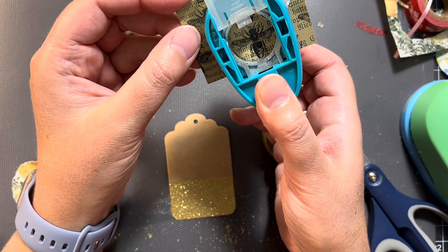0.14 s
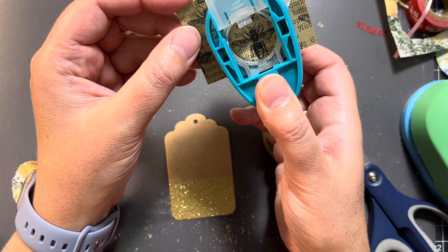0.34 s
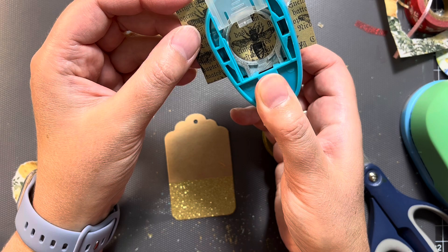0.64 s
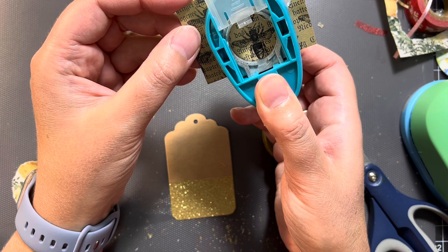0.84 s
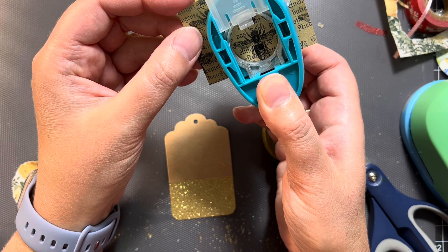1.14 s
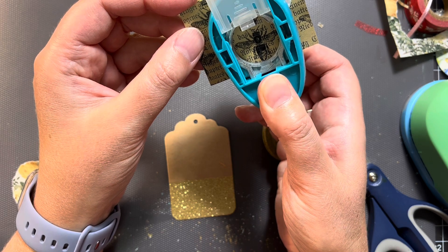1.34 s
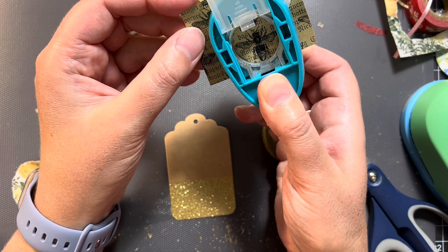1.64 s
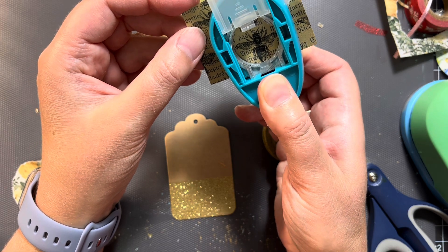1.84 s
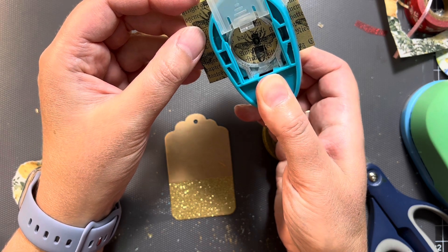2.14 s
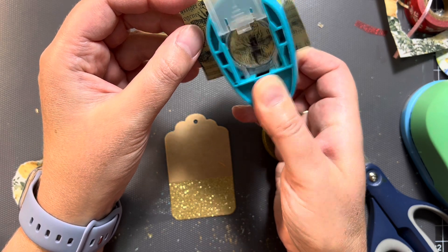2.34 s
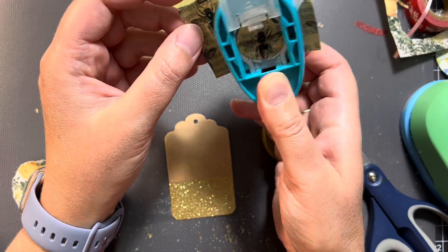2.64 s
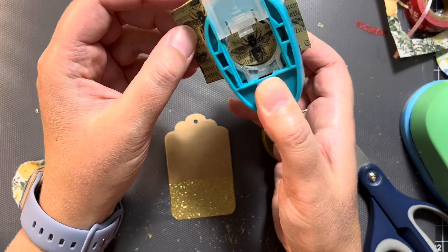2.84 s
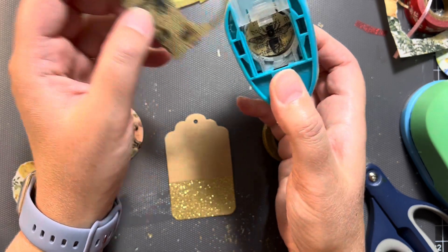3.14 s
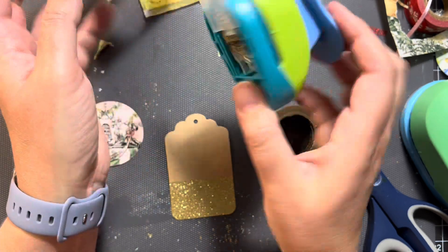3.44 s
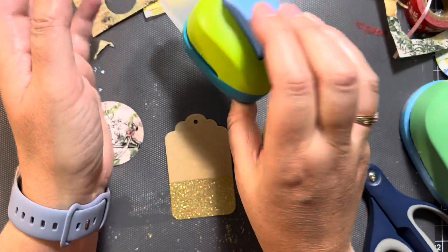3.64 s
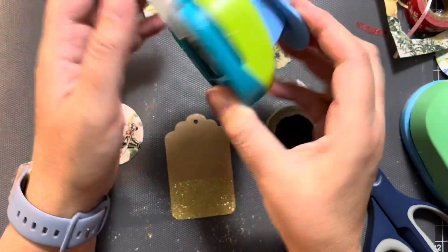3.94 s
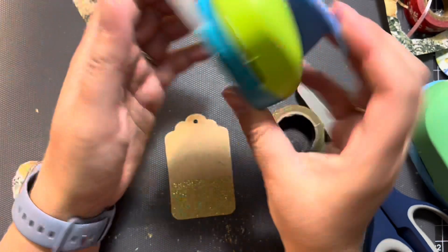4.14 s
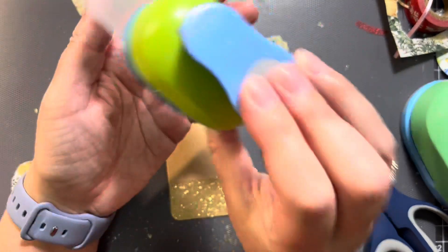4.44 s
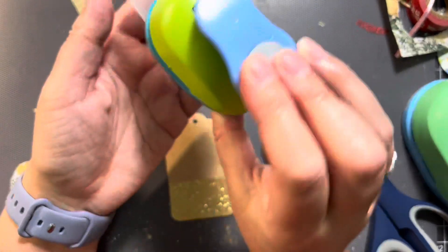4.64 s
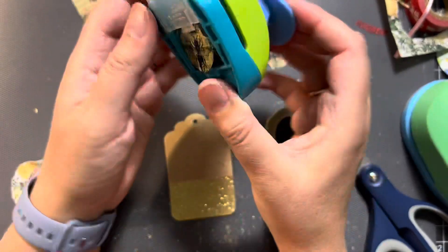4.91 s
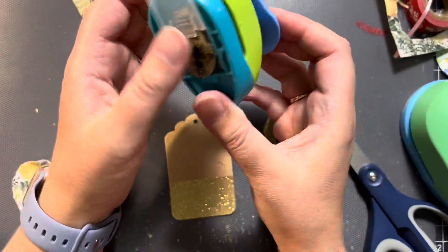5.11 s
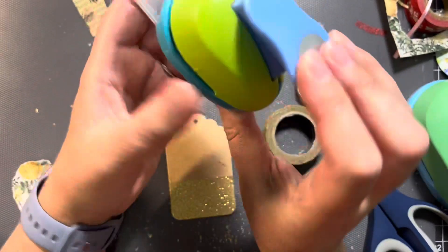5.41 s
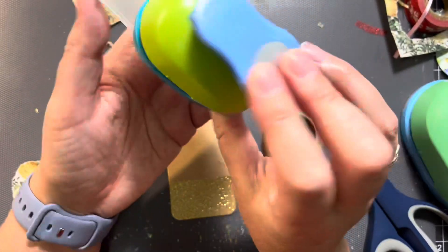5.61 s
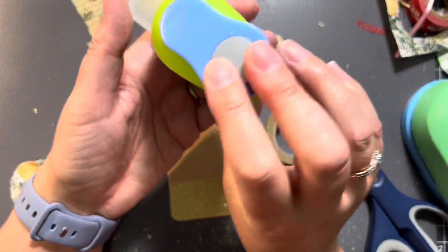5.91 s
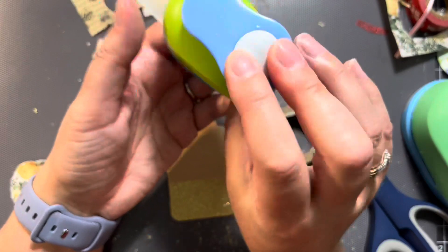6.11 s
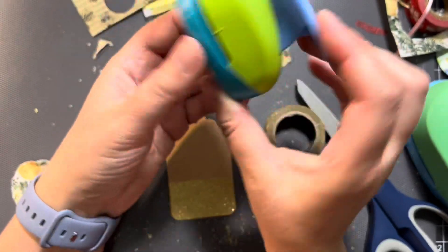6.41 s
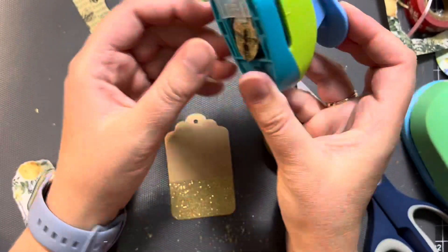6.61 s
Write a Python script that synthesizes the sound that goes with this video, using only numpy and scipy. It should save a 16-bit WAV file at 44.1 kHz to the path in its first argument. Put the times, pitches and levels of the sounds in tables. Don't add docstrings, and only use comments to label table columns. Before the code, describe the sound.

Close up in a quiet room, a hand punch clicks under pressure, cracks through card, springs back, and rattles lightly against a palm.

```python
import sys
import numpy as np
from scipy import signal
from scipy.fft import rfft, irfft
from scipy.io import wavfile
from scipy.ndimage import uniform_filter1d

SR = 44100
rng = np.random.default_rng(int(sys.argv[2]) if len(sys.argv) > 2 else 0)


def boost_factor(decibels):
    exponent = np.asarray(decibels, float) / 20
    return 10 ** exponent


def wrap_up_sound(samples):
    columns = np.atleast_2d(samples).T
    tamed = np.clip(columns, -1, 1)
    steps = np.round(tamed * 32767).astype(np.int16)
    wavfile.write(sys.argv[1], SR, steps)


N = 298248
SECONDS = np.arange(N) / SR

# frequency in Hz, density in dB per Hz.
AIR_SPECTRUM = [(7.1, -31.5), (12, 5.5), (63, -5.5), (80, -8), (245, -14), (386, -18.5), (491, -20),
                (589, -30), (926, -34.5), (1010, -31), (1970, -42), (3190, -40.5), (4060, -38),
                (12400, -39), (16300, -50.5)]
# frequency in Hz, rms level in dB.
APPLIANCE_TONES = [(425.3, -82), (489.9, -73.5), (559.9, -75.5), (786.0, -80), (1007, -82), (1055, -82.5),
                   (1120, -82.5), (3160, -90)]
# centre in seconds, half width in seconds, rise in dB.
TRAFFIC_SWELLS = [
    (2.6, 0.29, 5.6),
    (4.75, 0.62, 4.9),
    (6.03, 0.26, 5.4),
]
# centre in Hz, width in Hz, level in dB, decay time t60 in seconds.
ECHO_BANDS = [(400, 500, -39, 0.4), (930, 600, -36.5, 0.38), (1750, 380, -31, 0.3),
              (3000, 2000, -36.5, 0.2813), (5190, 4600, -30, 0.35), (7810, 4200, -29.5, 0.25),
              (9670, 2300, -33.5, 0.32), (11900, 5000, -31, 0.18)]
# start in seconds, length in seconds, level in dB, shell level in dB.
FINGER_RUBS = [(0.874, 0.043, -69, 3), (0.952, 0.0084, -67, 27), (1.212, 0.021, -59, 3.5),
               (1.325, 0.039, -65.5, -8), (1.448, 0.027, -62, -5), (1.709, .015, -71.5, -7),
               (1.763, 0.032, -67, -5), (1.906, 0.037, -59.5, 1), (2.005, 0.042, -68, -8),
               (2.17, 0.024, -70, -4.5), (2.33, 0.0093, -63, 4.5)]
# start in seconds, length in seconds, level in dB, shell level in dB.
SCRAP_RUBS = [(1.369, 0.057, -63.5, -9), (1.502, 0.088, -72, -9), (1.6, 0.093, -73.5, -8),
              (3.48, 0.04, -71, 1), (3.55, 0.052, -75.5, -1), (4.007, 0.026, -73, 10),
              (4.16, 0.046, -74, 12), (4.84, 0.08, -71, -2), (5.3, .06, -66, 2.5), (5.36, 0.058, -73, -2.5),
              (5.44, 0.043, -63.5, -9), (5.628, 0.068, -66, -4), (5.948, 0.064, -73, -7.5),
              (6.15, 0.062, -69, 2), (6.25, 0.042, -74, -10.5), (6.338, 0.075, -68, 0.5),
              (6.45, 0.068, -72.5, 5), (6.542, 0.062, -74.5, 7), (6.607, 0.031, -77, 11)]
# start in seconds, length in seconds, level in dB.
PALM_RUBS = [(3.399, 0.069, -74), (4.318, 0.053, -67), (4.53, 0.073, -72), (4.6, 0.043, -65.5),
             (4.926, 0.046, -75), (5.75, 0.057, -74), (5.84, 0.072, -69), (6.04, 0.053, -67),
             (6.215, 0.038, -65.5), (6.378, 0.073, -68.5)]
# start in seconds, length in seconds, level in dB, shell level in dB, edge level in dB.
SHEET_RUBS = [(2.55, 0.029, -66, 0, -12), (2.585, 0.042, -62, 10.5, -4), (2.628, 0.13, -63.5, 4.5, -3),
              (2.7, 0.11, -66.5, 4, -8), (2.85, 0.034, -66.5, 0, -3), (2.879, 0.04, -59.5, -7, -8),
              (2.958, 0.017, -53, -17, -1.5), (2.979, 0.041, -57.5, -4, -7), (3.025, 0.04, -60, -1, -9),
              (3.043, 0.052, -55, -2.5, -6), (3.097, 0.029, -64, 2.5, 2), (3.14, 0.023, -61.5, 4, -14)]
# start in seconds,
# length in seconds, level in dB, pitch in Hz.
ROUGH_TONE_EVENTS = [(0.955, 0.011, -47, 910), (1.419, 0.011, -48, 800), (5.4, 0.107, -63.5, 600),
                     (4.902, 0.14, -59.5, 607), (5.053, 0.139, -68, 590), (2.362, 0.057, -48, 1740),
                     (0.959, 0.025, -59, 1730), (1.012, 0.024, -62, 1650), (1.78, 0.022, -62, 1620),
                     (2.995, .045, -58, 5100), (3.11, .02, -64, 2900), (2.88, 0.038, -68, 3200),
                     (4.186, 0.019, -68, 4900), (4.158, .045, -63, 4200), (4.04, .012, -59, 2150),
                     (5.95, 0.114, -62.5, 630), (6.565, 0.024, -78, 4600), (6.55, .04, -73, 5550),
                     (6.215, .06, -72, 4200), (5.44, 0.026, -66, 4400), (2.36, .09, -55.5, 5300),
                     (0.965, 0.037, -61, 3200), (1.4, 0.069, -63, 1780), (2.703, 0.02, -42.5, 1740),
                     (3.035, 0.077, -57, 5900), (3.041, 0.026, -64, 2030), (4.4, 0.03, -57, 2120),
                     (4.083, 0.021, -67, 2270), (4.17, 0.039, -74, 5300), (4.532, 0.12, -66, 5520),
                     (4.4, 0.052, -65, 1940), (5.312, 0.046, -53, 1810), (5.313, 0.069, -63.5, 4180),
                     (6.39, 0.045, -60.5, 5470)]
# frequency in Hz, level in dB, decay time t60 in seconds.
GRIPPED_MODES = [
    [(620, -32, 0.006), (874, -10, 0.028), (1060, -5.5, 0.011), (1500, -5.5, 0.005), (1750, -8.5, 0.049), (2300, -4, 0.016)],
    [(2800, -6.5, 0.0071), (3420, -10.5, 0.015), (4230, -3, 0.006), (4770, 4, 0.0058), (5390, 5, 0.0039), (5500, -14.5, 0.0016), (7890, -12.5, 0.0069)],
]
SQUEEZED_MODES = [
    [(810, -5.5, .02), (1500, -8, .012), (1746, 0.5, .025), (2300, 1.5, 0.053)],
    [(2620, -10.5, .006), (2920, -4.5, 0.0092), (3170, -14, 0.017), (4082, -11.5, .025), (4970, -9, 0.019), (5182, -5.5, .004), (5662, -4, .012), (6300, -13, .006), (7330, -2, 0.0051)],
]
LOOSE_MODES = [
    [(766, -70, 0.006), (937, -11, 0.058), (1370, -12, 0.042), (1630, -10, .016), (1910, -1, 0.018), (2127, -5.5, 0.03)],
    [(3300, -42, 0.0094), (3720, -12, 0.014), (4260, 5, 0.0073), (4740, -5, 0.0065), (5320, -6, 0.018), (5570, -9, 0.0063), (7900, -4.5, 0.0035)],
]
# frequency in Hz, level in dB, decay time t60 in seconds.
EDGE_MODES = [(9070, -2, 0.0026), (10200, 0.5, 0.0026), (11670, -0.5, 0.0031), (12330, -5.5, 0.002),
              (12450, -3, 0.0053), (13600, -8.5, .002)]
# start in seconds, peak level in dB, shell mode in Hz, shell level in dB, die mode in Hz.
LEVER_TICKS = [(0.885, -48.5, 1710.0, -2.8, 4050.0), (0.9047, -53, 2310.0, -3.7, 5140.0),
               (0.9515, -36.9, 1850.0, -6, 4600), (0.9545, -32.5, 1670, -1, 4730),
               (0.958, -41, 1820, 10.5, 5260), (1.003, -42.7, 1670.0, -1, 4660),
               (1.0976, -32, 740, -1, 4400), (1.101, -39, 600.0, 0, 4400), (1.117, -47, 680.0, 0, 5430.0),
               (1.1265, -35, 800.0, -4.5, 4840), (1.205, -38.5, 1015, -1.5, 4730),
               (1.22, -36, 2130.0, -2.5, 4970), (1.2703, -48, 1520, 3, 4080.0),
               (1.3009, -30.3, 1880, -6, 4920.0), (1.334, -40, 1650, -11.1, 5300),
               (1.3468, -44.1, 1060.0, -3.5, 4130.0), (1.4195, -40.8, 1030.0, -8.6, 5440.0),
               (1.4226, -30, 734, -9.5, 4720.0), (1.4527, -41.5, 800.0, -9, 5340.0),
               (1.4834, -56, 990.0, -12, 4550.0), (1.5444, -48, 1810.0, -9, 5100),
               (1.557, -49.5, 1130.0, -16, 4760), (1.6365, -51.5, 1020.0, -11, 3960.0),
               (1.7685, -35, 980, -7, 5310.0), (1.771, -26.5, 2200, -10, 5140),
               (1.7738, -30.5, 1900, -3, 5280.0), (1.9117, -46.5, 1700, -9.7, 5230.0),
               (1.9281, -48, 980, 0, 4600), (2.0275, -55, 2020.0, -7.5, 5280.0),
               (2.0571, -42, 1870.0, -27, 5360), (2.1826, -58, 650.0, -6.3, 4810.0)]
LEVER_RELEASE = [(2.5894, -48, 835, 1, 3950.0), (2.5981, -29.5, 2330.0, -10.5, 4060.0),
                 (2.611, -36.5, 820.0, 1.5, 5680.0), (2.678, -41, 1770.0, -17, 4900),
                 (2.7032, -28.5, 1700.0, -5.5, 5000), (2.7244, -24, 860, -13, 4700),
                 (2.877, -48, 1860, -10, 4740.0), (2.887, -41.5, 870.0, -7, 5000.0),
                 (2.908, -47, 560.0, -14.4, 5350.0), (2.9436, -49, 1440.0, -13, 4110.0),
                 (2.9633, -42, 2300.0, -22, 5140.0), (3.0015, -46, 1980.0, -12, 5190.0),
                 (3.046, -44, 1970.0, -8.9, 5090.0), (3.059, -42, 1840.0, -16, 6030.0),
                 (3.068, -44, 780.0, -6, 4770.0), (3.1357, -42.5, 2220.0, -4, 2910.0)]
TRAY_RATTLES = [(3.4768, -45, 1410.0, -3, 4020.0), (3.5014, -54, 810.0, 0, 3230.0),
                (3.5594, -56, 920.0, 0, 5350.0), (3.832, -63.5, 2120, 13.5, 4090.0),
                (3.8999, -55.5, 989, 2.5, 4170.0), (4.0045, -48, 1990.0, 2.9, 3850.0),
                (4.0105, -40, 2070.0, -5, 5330.0), (4.0425, -45.5, 2110.0, -2.6, 4090.0),
                (4.0645, -51, 2240.0, -3, 4120.0), (4.0825, -56.7, 2140.0, 7, 4230.0),
                (4.1233, -56, 590.0, -4, 3940.0), (4.157, -52.6, 2070.0, -3.0, 4110.0),
                (4.1639, -48, 1850.0, -6, 4060.0), (4.1705, -38.5, 2030.0, -2.5, 4100.0),
                (4.1894, -50, 1860.0, 4, 5350.0), (4.197, -46, 1930.0, -1, 5350.0),
                (4.286, -51.5, 804, 3.5, 3940.0), (4.3162, -32.5, 930, -2, 4240),
                (4.3532, -32.5, 1950, -3, 3420.0), (4.3674, -45, 1910.0, 2.5, 4100),
                (4.4122, -45, 2090.0, 0, 4490.0), (4.4244, -46.5, 1890.0, -4, 4510.0),
                (4.4528, -37.5, 1070.0, -8, 4310.0), (4.4612, -41.5, 2330.0, -5, 3970),
                (4.4712, -50.0, 1780.0, 2, 4260.0), (4.512, -51.7, 640.0, -7, 3630),
                (4.5331, -48, 1910.0, -11, 3580),
                (4.848, -43.5, 1920.0, 0, 5520.0), (4.8702, -54.5, 1920.0, 7.5, 4120.0),
                 (4.886, -45.5, 1940, 3, 4430), (4.9042, -55, 2100.0, 5, 3810.0),
                 (4.931, -47.5, 2190.0, -5, 4360), (4.965, -59, 570.0, 3, 4490.0),
                 (5.306, -39, 1835, -1.5, 4260.0), (5.332, -49, 1840.0, -2, 4040.0),
                 (5.4475, -53, 1890.0, -3, 4500.0), (5.4635, -48, 1830.0, -9, 4500.0),
                 (5.6315, -39, 900.0, -4, 4260.0), (5.636, -43.5, 1950.0, 4.5, 4000),
                 (5.668, -51.4, 1180.0, -5.7, 4950.0), (5.685, -37.5, 830, -6.5, 3950.0),
                 (5.6994, -43, 840.0, -2, 4040), (5.7377, -53, 1920, 10.5, 4480.0),
                 (5.9863, -55, 900.0, 0, 4970.0), (6.0491, -58, 580.0, -2.0, 4500.0),
                 (6.1449, -58, 1010.0, -2.7, 4510.0), (6.1738, -42, 2120.0, 0.5, 4090.0),
                 (6.181, -43, 2070.0, 1.5, 4220.0), (6.189, -51, 1880.0, 9.5, 3680.0),
                 (6.3453, -59, 2000.0, 1, 5600), (6.3756, -51.5, 1930.0, 2, 5420.0),
                 (6.5682, -56, 1710, 2, 4400.0), (6.613, -47.1, 760.0, 4, 4100.0),
                 (6.629, -62.5, 785, 11.5, 4150.0)]
OPENING_CRACKS = [(1.0036, -31, 1680, -8, 4640), (1.0966, -33, 1750, -12, 5260),
                  (1.2057, -38, 1020, -10, 4400), (1.3007, -29.5, 1840, -6, 4900),
                  (1.4228, -21, 2290, -11, 4600), (2.0587, -40, 1880, -23, 5360),
                  (2.6114, -27, 1740, -8, 5120), (2.6792, -32, 1730, -11, 4900),
                  (2.7246, -19.5, 2020, -6, 4500), (3.1362, -39, 1850, -10, 5390),
                  (4.0108, -44, 2050, -8, 5520), (4.3166, -31, 920, -12, 4220),
                  (4.3529, -32, 1900, -8, 3400), (4.887, -36, 1910, -10, 4370),
                  (4.9307, -38, 2160, -8, 4280), (5.6316, -26, 907, -16, 4330),
                  (5.685, -37, 1890, -10, 4080), (6.1741, -42, 2090, -13, 4170)]
# start in seconds, peak level in dB, shell mode in Hz, shell level in dB, edge level in dB.
DIE_SNAP = [(2.3299, -37, 2284, -5, -11), (2.3465, -23, 1750, 0, -11), (2.3493, -19, 1500, -0.5, -8),
            (2.3512, -17.5, 1500, -2.5, -8), (2.353, 3, 2300, -17, -9.5), (2.354, -8.5, 2323, -8, -4),
            (2.3557, -4, 2320, -20, -16.5), (2.3559, -4, 1587, -17.5, -15), (2.3595, -12, 1750, -15.5, -11),
            (2.3605, -27, 1750, 0.5, -4.5), (2.3650, -28, 1750, 3, -5)]
# edge level of a middling click in dB, edge dB lost per dB of force,
# edge dB lost per second of grip, edge dB gained per dB of shell.
PRESSING_COLOUR = (-10.5, -0.17, 5, 0.5)
RELEASE_COLOUR = (-16.5, -0.1, -5, 0.3)
SHAKING_COLOUR = (-17, 0.7, 0.7, -0.8)
CRACK_COLOUR = (-17, -0.4, 0.8, 0.6)


def band(x, hz, width):
    return signal.lfilter(*signal.iirpeak(hz, hz / width, SR), x)


def unit(x):
    return x / np.sqrt(np.mean(x ** 2))


def decay(t, t60):
    return 1000. ** (-t / t60)


def walk(rate):
    hold = int(SR / rate)
    steps = np.repeat(rng.standard_normal(N // hold + 1), hold)
    return 1.4 * uniform_filter1d(uniform_filter1d(steps, hold), hold)[:N]


def rumble():
    hz, db = np.transpose(AIR_SPECTRUM)
    f = np.fft.rfftfreq(N, 1 / SR)
    shape = boost_factor(np.interp(np.log(f + 1), np.log(hz), db))
    return boost_factor(-56.5) * unit(irfft(rfft(rng.standard_normal(N)) * shape, N))


def appliance_tones():
    out = np.zeros(N)
    for hz, db in APPLIANCE_TONES:
        level = boost_factor(db + 4.0 + 0.52 * walk(3.8))
        out += level * np.sin(2 * np.pi * np.cumsum(hz + 1.2 * walk(2.2)) / SR)
    return out


def traffic():
    rise_db = sum(db * np.exp(-((SECONDS - s) / half) ** 2) for s, half, db in TRAFFIC_SWELLS)
    return unit(band(rng.standard_normal(N), 618, 860)) * boost_factor(-70 + rise_db)


def echo(x):
    t = SECONDS[:SR // 2]
    tail = np.zeros(len(t))
    for hz, width, db, t60 in ECHO_BANDS:
        tail += boost_factor(db - 20.0) * unit(band(rng.standard_normal(len(t)), hz, width)) * decay(t, t60)
    build_up = 1 - np.exp(-(t / 0.0017) ** 2)
    return signal.fftconvolve(x, tail * build_up)[:N]


def thump():
    t = np.maximum(SECONDS - 2.3495, 0)
    modes = [(62.3, -30.5, 0.098), (340, -25.5, .025), (170, -36.5, 0.0095)]  # Hz, dB, t60 s
    return sum(boost_factor(db) * np.sin(2 * np.pi * hz * t) * decay(t, t60) for hz, db, t60 in modes)


def swell(length, soft_s):
    t = SECONDS[:8192] - .02
    return np.clip(np.tanh(t / (.5 * soft_s)) - np.tanh((t - length) / soft_s), 0, 2) / 2


def scuffs():
    fingers = [(*row, 1.9) for row in FINGER_RUBS]
    scrap = [(*row, -4) for row in SCRAP_RUBS]
    palm = [(*row, -2.5, 1.5) for row in PALM_RUBS]
    return SHEET_RUBS + fingers + scrap + palm


def rubbing():
    slip_size = np.minimum(rng.exponential(size=N), 4.5)
    fibres = rng.standard_normal(N) * boost_factor(4.5 * slip_size + 1.5 * walk(150))
    die = band(band(fibres, 4250, 950), 4250, 1400)
    die += band(band(fibres, 4700, 900), 5400, 1200) + 0.22 * band(fibres, 4000, 5000)
    shell = band(fibres, 1946, 490) + 0.55 * band(fibres, 2900, 1100) + 0.24 * band(fibres, 1104, 500)
    edge = band(band(fibres, 12400, 5400), 11000, 5000)
    edge += .55 * band(band(fibres, 7100, 2500), 9300, 3496)
    push = np.zeros((3, N + 8192))
    for s, length, db, shell_db, edge_db in scuffs():
        levels = boost_factor(db + np.array([[0], [shell_db], [edge_db]]))
        push[:, int(s * SR) - 882:][:, :8192] += swell(length, 0.007) * levels
    return sum(unit(x) * p[:N] * boost_factor(2.0 * walk(90)) for x, p in zip((die, shell, edge), push))


def rough_tones():
    out = np.zeros(N + 8192)
    for s, length, db, hz in ROUGH_TONE_EVENTS:
        width = 25 + 0.03 * hz + 2.2 / length
        song = unit(band(band(rng.standard_normal(8192), hz, width), hz, 2 * width))
        out[int(s * SR) - 882:][:8192] += boost_factor(db) * swell(length, 0.0057) * song
    return out[:N]


def ring(modes):
    t, out = SECONDS[:1536], np.zeros(1536)
    for hz, db, t60 in modes:
        detune, vary_db = rng.standard_normal(2) * (.007, 2.0)
        out += boost_factor(db + vary_db) * np.sin(2 * np.pi * hz * (1 + detune) * t) * decay(t, t60)
    return out / np.sqrt(np.sum(out ** 2))


def slip_burst(db, slip_ms, grain_db):
    x = SECONDS[:1024] * 1000 / slip_ms
    grains = rng.standard_normal(1024) * boost_factor(grain_db * rng.standard_normal(1024))
    burst = grains * x ** 0.52 * np.exp(-x ** 1.6)
    return burst * 0.45 * boost_factor(db) * np.sqrt(slip_ms * SR / 1000 / np.sum(burst ** 2))


def clicks(table, body, slip_ms, grain_db=1.0, blur_s=0.00098, merge_s=None):
    out, power = np.zeros((2, N + 4096)), 0
    for s, db, shell_hz, shell_db, die_hz, edge_db in table:
        burst = slip_burst(db, slip_ms, grain_db)
        blow = np.sqrt(np.sum(burst ** 2)) * np.sign(burst[1]) * signal.unit_impulse(1024, idx=20)
        shell = ring(body[0] + [(shell_hz, -0.6, .019)])
        die = ring(body[1] + [(die_hz, 3.5, .009)])
        close = boost_factor(shell_db + 2.5) * shell + die + boost_factor(edge_db + 7.5) * ring(EDGE_MODES)
        walls = close * np.exp(-SECONDS[:1536] / blur_s)
        walls *= np.sqrt(np.sum(close ** 2) / np.sum(walls ** 2))
        both = signal.fftconvolve(np.array([burst, blow]), np.array([close, walls]), axes=1)
        out[:, int((s - .0006) * SR):][:, :2559] += both
        power = power + np.abs(rfft(both[1], 4096)) ** 2
    if merge_s:
        one_blow = np.fft.fftshift(irfft(np.sqrt(power)))
        out[1] = np.roll(np.pad(one_blow, (0, N)), int(merge_s * SR) - 4096 // 2)
    return out[:, :N]


def coloured(table, edge_db, db_per_force, db_per_s, db_per_shell):
    rows = []
    for s, db, shell_hz, shell_db, die_hz in table:
        force_db = db + 55.5
        edge = edge_db - db_per_force * force_db - db_per_s * (s - table[0][0]) + db_per_shell * shell_db
        rows.append((s, db, shell_hz, shell_db, die_hz, edge))
    return rows


def tray():
    return clicks(coloured(TRAY_RATTLES, *SHAKING_COLOUR), LOOSE_MODES, 3.45)


def cracks():
    return boost_factor(-4) * clicks(coloured(OPENING_CRACKS, *CRACK_COLOUR), GRIPPED_MODES, 0.92)[0]


def lever():
    ticks = coloured(LEVER_TICKS, *PRESSING_COLOUR) + coloured(LEVER_RELEASE, *RELEASE_COLOUR)
    return clicks(ticks, GRIPPED_MODES, 3.12)


def snap():
    slips = [(*row[:4], 5330, row[4]) for row in DIE_SNAP]
    return clicks(slips, SQUEEZED_MODES, 0.91, grain_db=9.5, blur_s=0.0013, merge_s=2.353)


def scene():
    close, walls = lever() + snap() + tray() + rubbing() + rough_tones()
    near = close + echo(walls) + cracks()
    near = signal.sosfilt(signal.butter(3, 470, "high", fs=SR, output="sos"), near)
    near = signal.sosfilt(signal.cheby1(6, .5, 13600, fs=SR, output="sos"), near)
    return (near + thump() + rumble() + appliance_tones() + traffic())[None]


def band_limit(x):
    return signal.sosfilt(signal.butter(12, 16430, fs=SR, output="sos"), x)


def record(dry):
    dull = signal.sosfilt(signal.cheby1(8, .5, 15000, fs=SR, output="sos"), dry)
    return band_limit(np.clip(dull, -1, 1))


dry = scene()
out = record(dry)
wrap_up_sound(out)
```